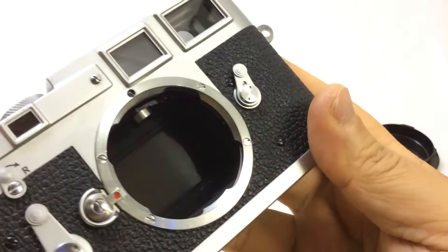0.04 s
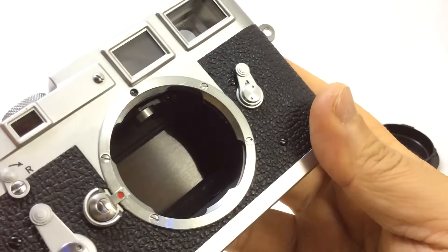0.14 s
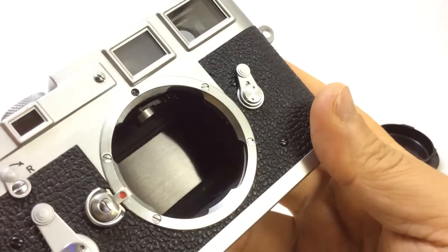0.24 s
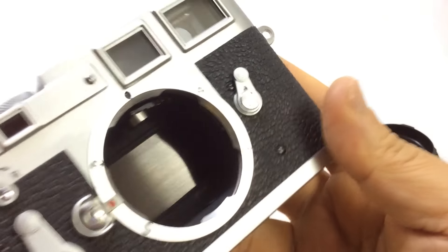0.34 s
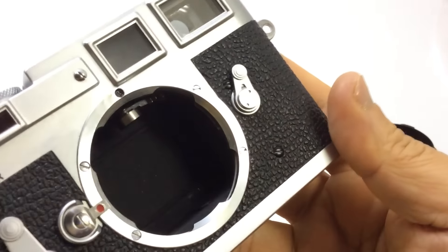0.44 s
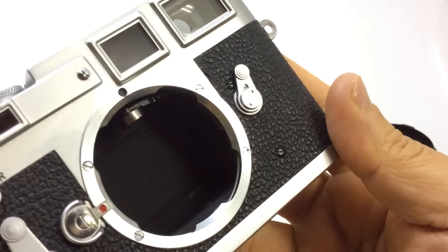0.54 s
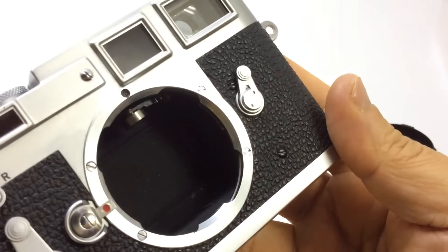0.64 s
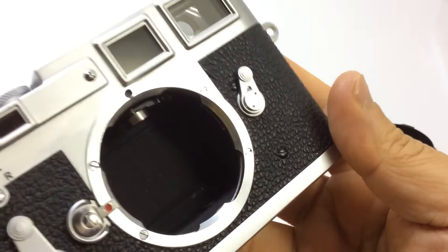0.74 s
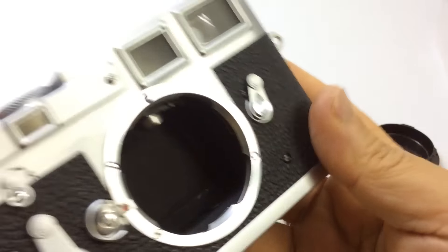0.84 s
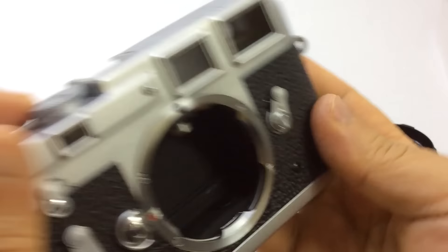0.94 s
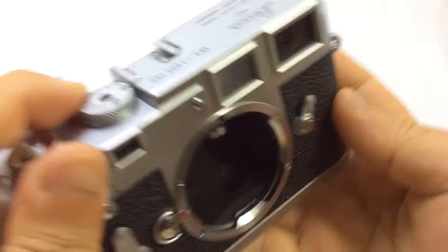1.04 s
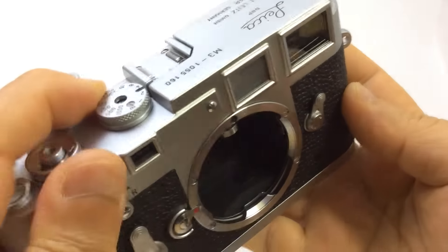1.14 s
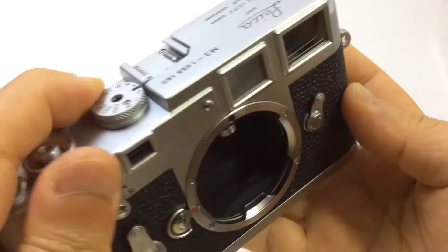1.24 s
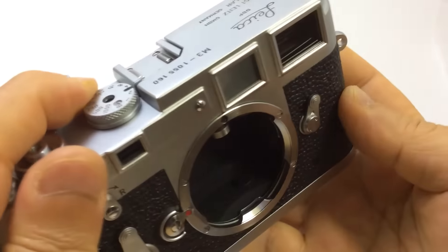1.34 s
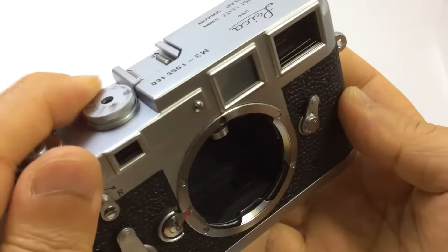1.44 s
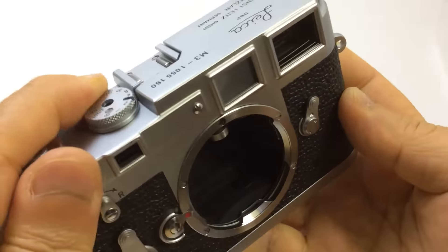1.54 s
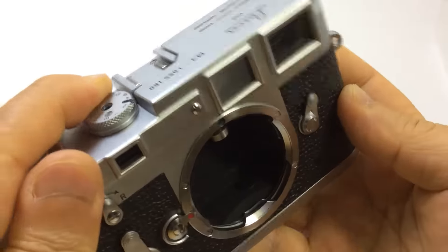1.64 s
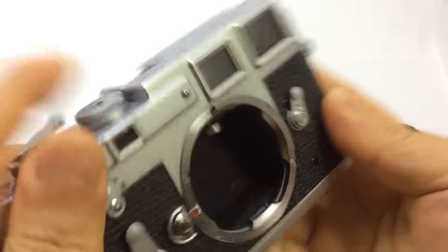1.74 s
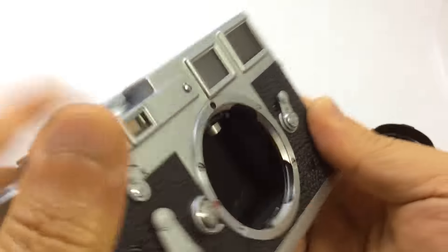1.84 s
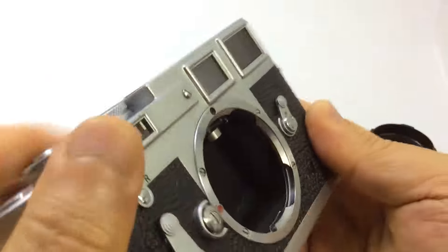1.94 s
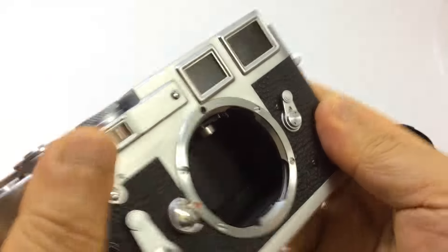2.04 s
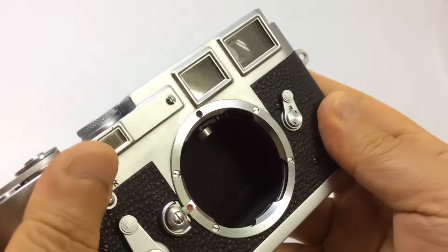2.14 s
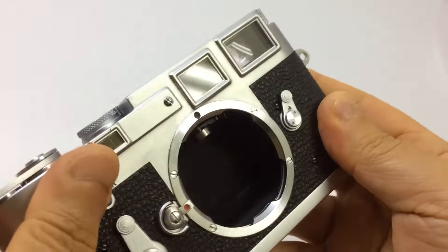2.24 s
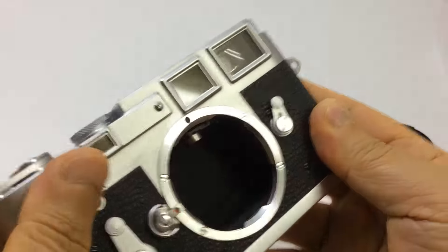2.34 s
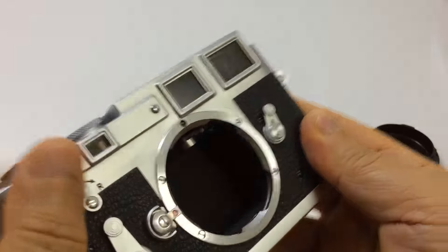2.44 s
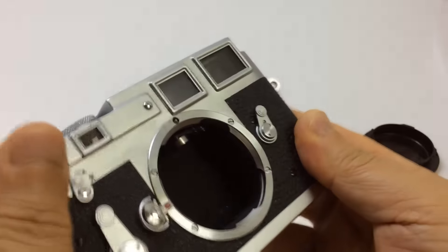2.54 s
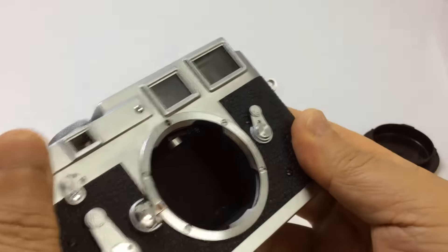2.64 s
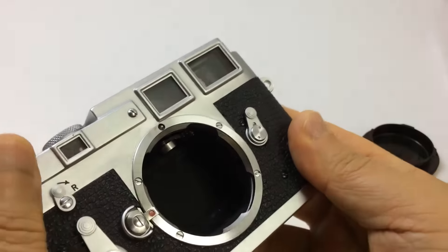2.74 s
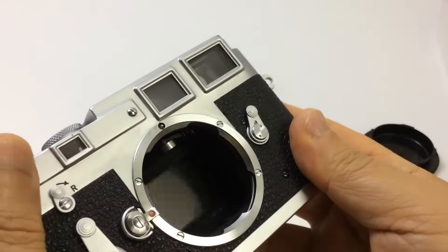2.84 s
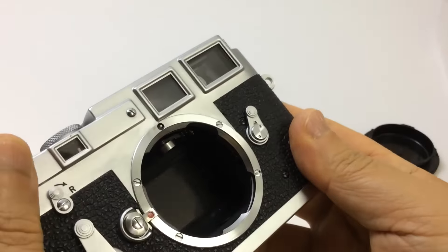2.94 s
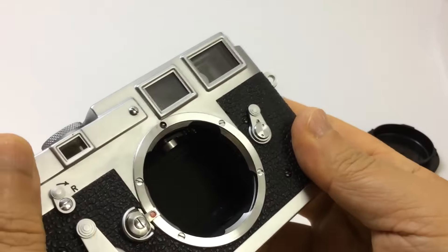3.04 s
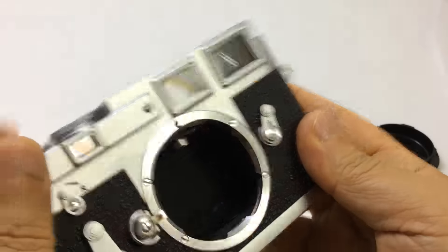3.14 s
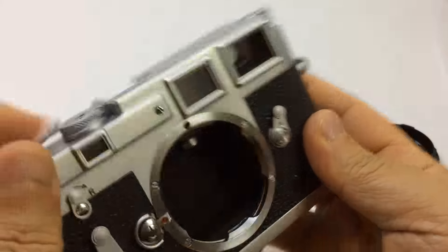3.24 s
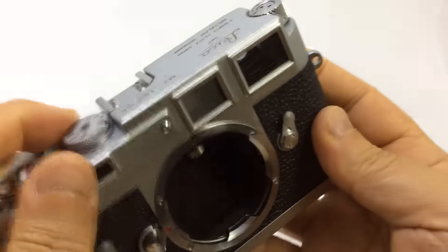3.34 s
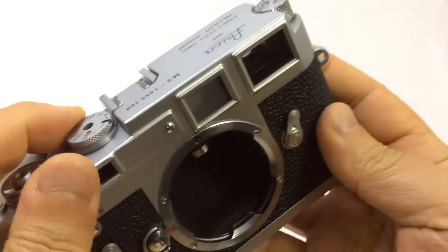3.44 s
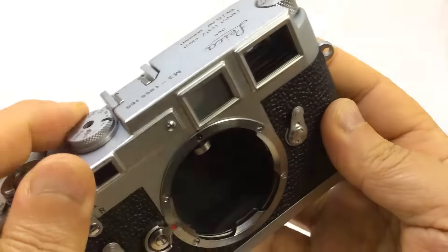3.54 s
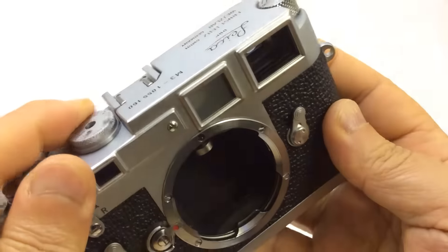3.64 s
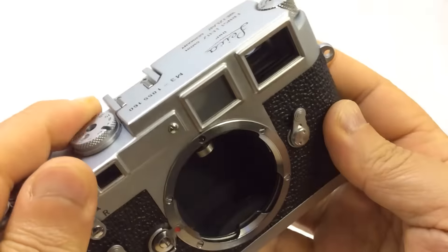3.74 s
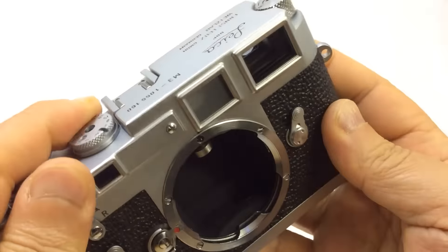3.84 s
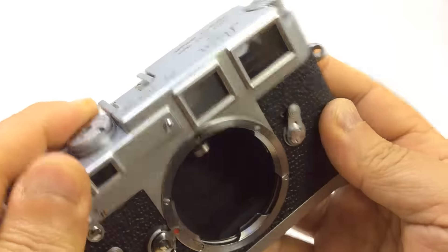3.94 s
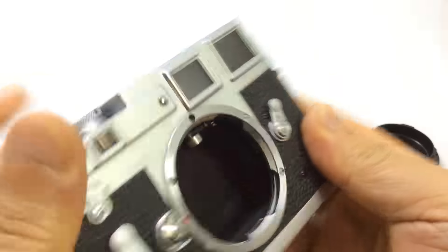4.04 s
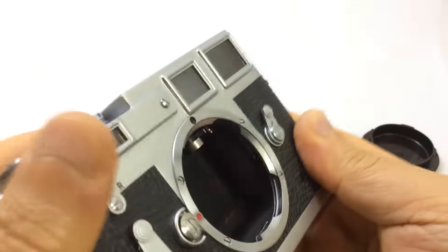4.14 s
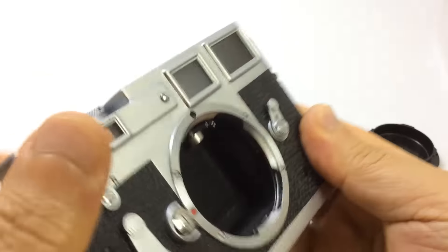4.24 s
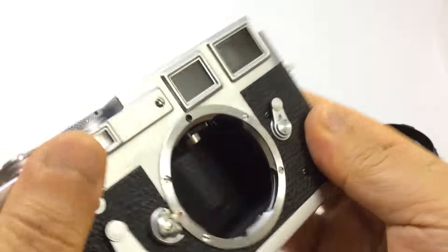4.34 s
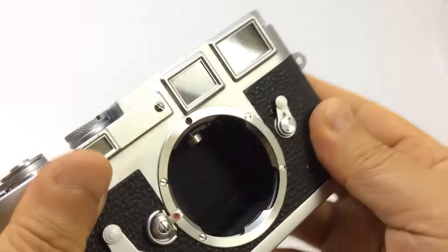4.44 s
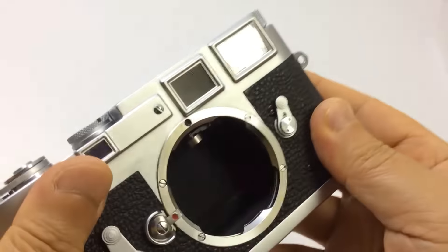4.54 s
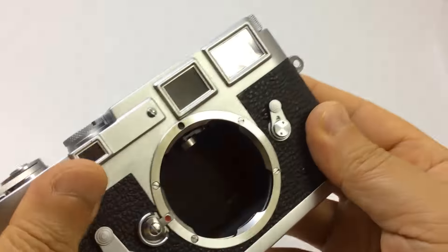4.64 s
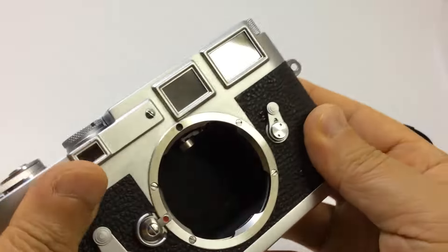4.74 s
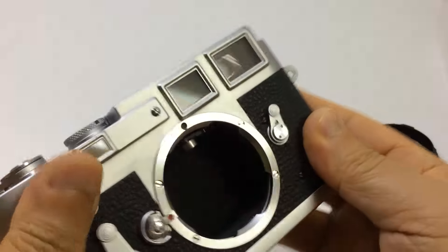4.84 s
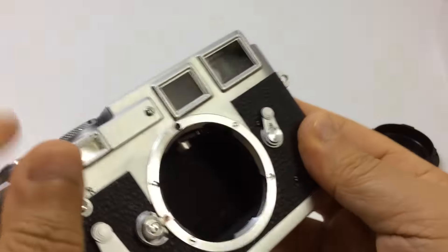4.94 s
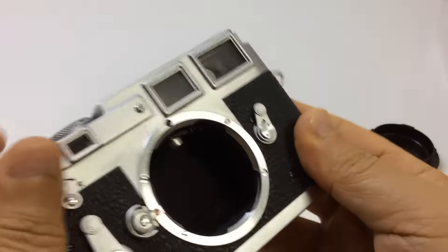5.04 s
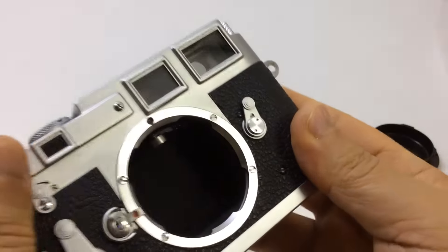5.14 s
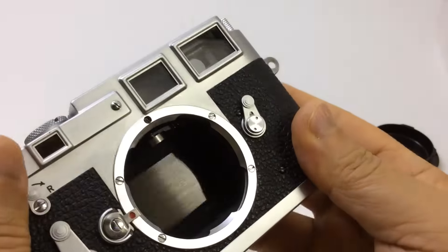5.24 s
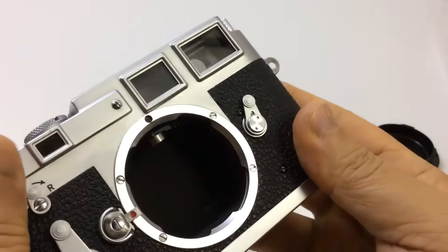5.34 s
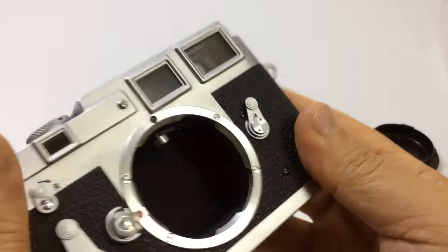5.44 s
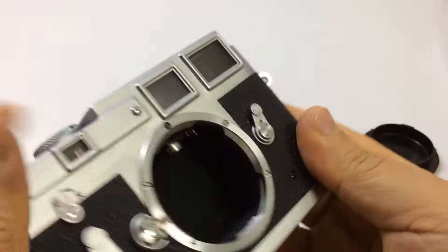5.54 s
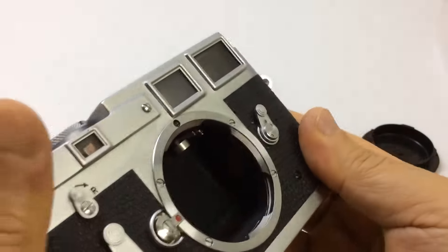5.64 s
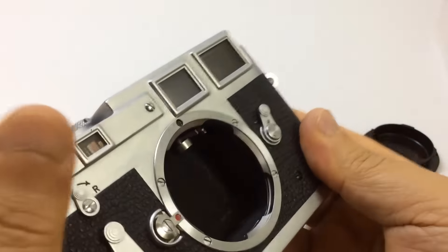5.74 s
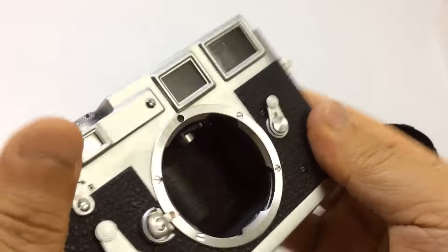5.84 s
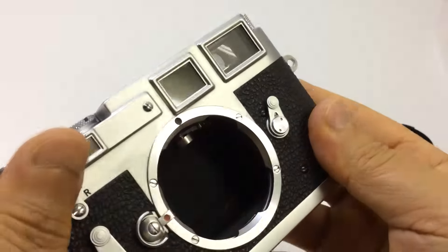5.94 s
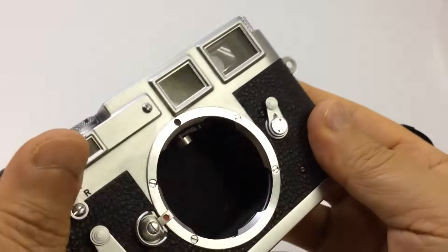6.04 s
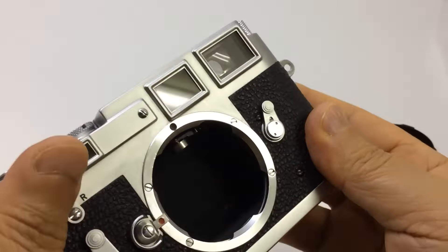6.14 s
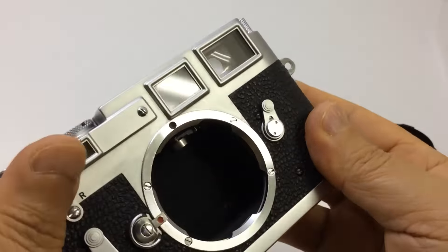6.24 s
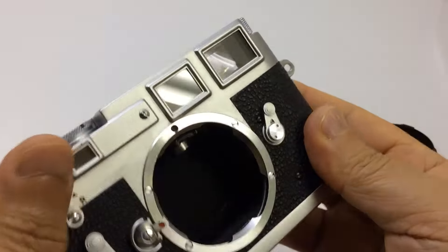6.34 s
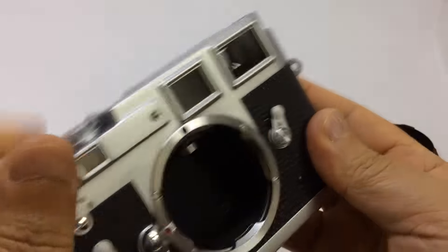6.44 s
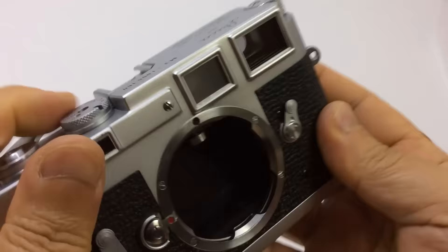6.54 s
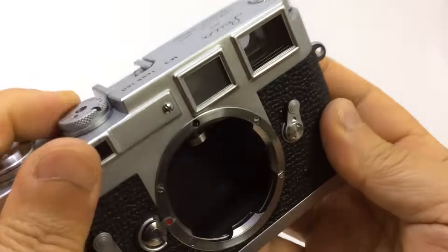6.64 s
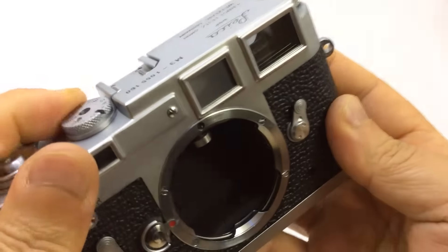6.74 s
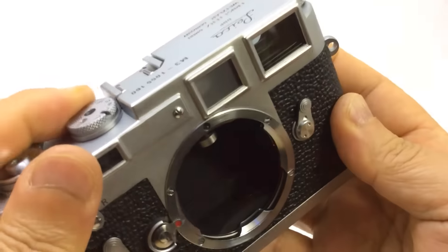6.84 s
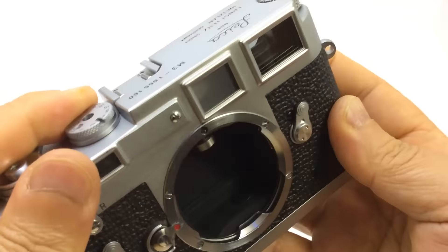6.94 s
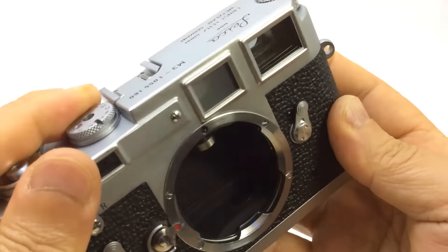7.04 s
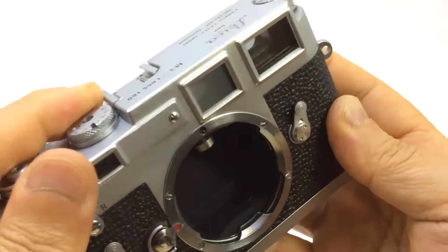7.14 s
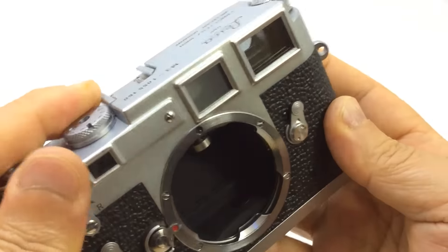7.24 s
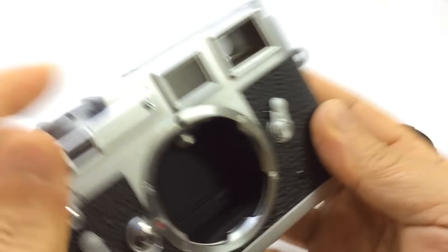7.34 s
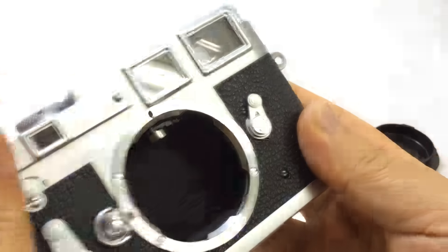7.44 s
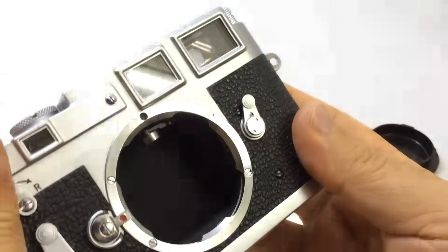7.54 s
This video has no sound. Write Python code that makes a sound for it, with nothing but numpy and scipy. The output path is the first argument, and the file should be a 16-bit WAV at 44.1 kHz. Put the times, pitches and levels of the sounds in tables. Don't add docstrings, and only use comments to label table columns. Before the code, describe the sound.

Close up, a small metal film camera is operated in a quiet workshop with low mains hum, faint hiss and a wavering distant rumble. At 0.15 s the shutter catch lets go with a rattling snap; at 0.44 s the curtains slam with a bright, hard clack. A fine, fast escapement buzz, about ninety ticks a second, runs until 1.1 s. Soft finger touches and faint dial clicks follow at 1.5-1.95 s. From 2.0 s gears knock, a pawl snaps, and the lever hits its stop at 2.3 s, then ratchets back and lands at 2.57 s. The shutter releases at 2.87 s and slams at 3.03 s, with a shorter buzz to 3.4 s. Light clicks, then winding at 4.3-4.7 s and return at 5.0 s. A third firing at 5.3-5.4 s has no buzz; winding at 5.8-6.2 s, return at 6.55 s. Faint handling ends at 7.6 s.

```python
import sys
import numpy as np
from scipy import signal
from scipy.fft import rfft, irfft
from scipy.io import wavfile

SR = 44100
rng = np.random.default_rng(int(sys.argv[2]) if len(sys.argv) > 2 else 0)


def persist_wave(psi):
    counts = np.round(np.clip(psi, -1, 1) * 32767).astype(np.int16)
    wavfile.write(sys.argv[1], SR, np.atleast_2d(counts).T)


def ratio_of_db(decibels):
    return 10 ** (np.asarray(decibels, float) / 20)


N = 334322
TIME = np.arange(N) / SR


def rms_one(x):
    return x / np.sqrt(np.mean(x ** 2) + 1e-20)


def in_time(rows, rest=-120):
    s, *columns = np.transpose(rows)
    return np.array([np.interp(TIME, s, c, rest, rest) for c in columns])


def band(x, low_hz, high_hz, order=2):
    edges_hz = [low_hz, min(high_hz, .45 * SR)]
    return signal.sosfilt(signal.butter(order, edges_hz, "band", fs=SR, output="sos"), x)


def drift(rate_hz):
    r = np.exp(-80 * np.pi * rate_hz / SR)
    slow = signal.lfilter([1], [1, -2 * r, r * r], rng.standard_normal(N // 40 + 2002))[2000:]
    return np.interp(np.arange(N) / 40, np.arange(len(slow)), rms_one(slow))


def ring(force, hz, t60):
    r = ratio_of_db(-60 / (t60 * SR))
    w = 2 * np.pi * hz / SR
    return signal.lfilter([0, np.sin(w)], [1, -2 * r * np.cos(w), r * r], force + 1e-18)


def grit(spread_db):
    size = np.minimum(rng.exponential(1, N), 4)
    return rms_one(rng.standard_normal(N) * ratio_of_db(spread_db * size))


def shaped(points):
    hz = np.fft.rfftfreq(N, 1 / SR) + 1
    table = np.array(points)
    gain = ratio_of_db(np.interp(np.log(hz), np.log(table[:, 0]), table[:, 1]))
    x = irfft(rfft(rng.standard_normal(N)) * gain, N)
    return x / np.std(band(x, 200, 15500))


def contact_rows(rows, low_db, high_db, t60=None):
    rows = np.array(rows)
    has_brightness = rows.shape[1] - (t60 is None) > 2
    bright = rows[:, 2] if has_brightness else 0
    rattle = rows[:, -1] if t60 is None else np.full(len(rows), t60)
    start, middle = rows[:, 0], rows[:, 1]
    return np.transpose([start, middle, middle + low_db - bright, middle + high_db + bright, rattle]).tolist()


# from_hz, to_hz
RATTLE_RANGES = [(2540, 7460), (980, 4350), (6310, 10470)]
LONGEST_RING_S, PAIR_SPLIT_HZ = .042, 50


def struck(contacts, modes, rise_s, spread_db, top_db, knock_db, thud_db):
    t = np.arange(SR // 8) / SR
    shape, knocks = np.zeros((4, N + SR)), np.zeros((4, N))
    for s, *levels_db, t60 in contacts:
        levels_db.append(min(levels_db[:2]))
        burst = (1 - np.exp(-t / rise_s)) * ratio_of_db(-60 * t / t60)
        at = round(s * SR) - 20
        shape[:, at:at + len(t)] += np.outer(ratio_of_db(np.array(levels_db)), burst / burst.max())
        knocks[:, at + 30] = ratio_of_db(np.array(levels_db) + knock_db)
    force = grit(spread_db) * shape[:, :N]
    out = ratio_of_db(top_db) * band(force[2], 12500, 13000)
    out += ratio_of_db(thud_db) * band(knocks[3], 310, 800)
    for row, (low, high) in zip(force, RATTLE_RANGES):
        out += band(row, low, high) * np.sqrt(SR / 2 / (high - low)) * ratio_of_db(-5)
    for hz, level_db, t60 in modes:
        row = 3 if hz < 1000 else 1 if hz < 2400 else 0 if hz < 6500 else 2
        drive = knocks[row] + .5 * force[row]
        held = min(t60, LONGEST_RING_S * (1100 / hz) ** .4)
        split = min(PAIR_SPLIT_HZ, .04 * hz)
        pair = ring(drive, hz - split, held) - ring(drive, hz + split, held)
        out += ratio_of_db(level_db - 28.0) * pair
    return out


# pitch_hz, level_db
HUM = [(120, -60), (240, -76), (360, -79.5)]
# time_s, level_db
DRONE = [(0, -92), (2.4, -86.5), (2.8, -78), (4.3, -74), (4.6, -83), (7.58, -87.5)]
# time_s, level_db
RUMBLE = [(0, -63), (.25, -64.5), (1.06, -55.5), (1.6, -65), (2.03, -60), (2.3, -70), (2.66, -62.5),
          (3.05, -71), (4.43, -67.5), (5.32, -77.5), (6.36, -72), (7.58, -84.5)]
# time_s, level_db
MACHINES = [(0, -70.5), (.69, -68.5), (1.06, -62), (1.6, -65.5), (2.1, -60), (2.66, -65.5), (3.02, -63.5),
            (3.97, -71.5), (4.43, -66.5), (5.32, -77.5), (6.36, -73.5), (7.2, -74), (7.58, -70.5)]
# pitch_hz, level_db per Hz
HISS = [(20, -5), (40, 5), (62, 4.5), (100, 14), (160, 7.5), (250, 7.5), (400, -6.5), (630, -6.5),
        (1300, -17), (2200, -15), (5000, -19), (8500, -17), (11000, -22.5), (15500, -29.5)]
HISS_DB = -72
DRONE_HZ, RUMBLE_HZ = 191, 52.8
STIR_DB, STIR_FOLLOWS, STIR_DB_PER_S = -75.5, 0.55, 1.09


def background():
    rumble_db, murmur_db = in_time(RUMBLE)[0], in_time(MACHINES)[0]
    stir_db = STIR_DB + STIR_FOLLOWS * (murmur_db - murmur_db.mean()) + STIR_DB_PER_S * TIME
    out = ratio_of_db(HISS_DB) * shaped(HISS)
    for hz, level_db in HUM:
        tone = np.sin(2 * np.pi * hz * TIME + rng.uniform(0, 5))
        out += np.sqrt(2) * ratio_of_db(level_db + .3 * drift(2)) * tone
    rumble_turns = np.cumsum(RUMBLE_HZ + 1.5 * drift(2)) / SR
    out += ratio_of_db(rumble_db + 1.5) * (1 + .2 * drift(6)) * np.sin(2 * np.pi * rumble_turns)
    out += ratio_of_db(in_time(DRONE, rest=-94.0)[0]) * rms_one(ring(rng.standard_normal(N), DRONE_HZ, 0.4))
    murmur = np.zeros(N)
    for low in (630, 840, 1110):
        murmur += ratio_of_db(2 * drift(3)) * band(rng.standard_normal(N), low, low * 1.33)
    stir = band(rng.standard_normal(N), 200, 520)
    out += ratio_of_db(murmur_db - 5.5 + 1.5 * drift(2.6)) * rms_one(murmur)
    return out + ratio_of_db(stir_db - 6 + 3.0 * drift(5.0)) * rms_one(stir)


# start_s, level_db, pitch_hz
CURTAIN_SNAPS = [(.1475, -31, 8900), (.149, -23.5, 9400), (.1524, -21.5, 3800), (.1597, -27, 1990),
                 (.1653, -29.5, 3500), (.169, -28.5, 8100), (0.1741, -20, 8180), (0.174, -24.5, 3650),
                 (.1807, -26.5, 8200), (.2915, -46, 1200), (0.4157, -32, 8700), (.4162, -35.5, 3800),
                 (3.0045, -36, 3600), (3.006, -35.5, 8500), (.4393, -12, 10900), (0.439, -18.5, 7650),
                 (0.4406, -14.5, 1680), (.4425, -15, 6250), (.4435, -18, 3680), (.4462, -16, 10700),
                 (2.8674, -34, 8040), (2.869, -21.5, 9300), (2.872, -21, 3880), (2.8793, -26, 10530),
                 (2.8884, -26, 8450), (2.8942, -19.5, 8360), (2.8944, -24.5, 3700), (2.9084, -33, 8200),
                 (3.029, -11, 10510), (3.0314, -16, 9200), (3.0333, -23, 1900), (5.2976, -19.5, 7600),
                 (5.3007, -24.5, 2080), (5.3029, -23, 1690), (5.3087, -23, 7700), (5.3195, -19.5, 7070),
                 (5.3988, -10.5, 10560), (5.3992, -19.5, 4000), (5.399, -17.5, 1900), (5.4051, -23, 8100),
                 (5.4078, -20.5, 10700), (5.4097, -21.5, 9500)]
# start_s, level_db, pitch_hz
LEVER_SNAPS = [(1.513, -58, 3700), (1.5885, -43, 3810), (1.7984, -59, 3500), (1.8302, -55, 3200),
               (1.947, -50, 3500), (2.0336, -34, 3600), (2.0465, -42, 3700), (2.0492, -31.5, 5120),
               (2.0531, -33, 7600), (2.0682, -32, 3160), (2.0727, -41, 3700), (2.1446, -28, 9700),
               (2.144, -33, 5800), (2.2614, -40.5, 2100), (2.2857, -31, 3850), (2.307, -18, 4950),
               (2.315, -35, 3210), (2.5671, -17, 3780), (2.5675, -28.5, 2254), (2.5706, -33.5, 1410),
               (4.315, -29, 5150), (4.3165, -28.5, 5270), (4.321, -33, 8900), (4.3262, -25, 8700),
               (4.3275, -26.5, 3030), (4.3438, -38, 1790), (4.436, -26, 7630), (4.436, -28.5, 5800),
               (4.4363, -32.5, 3280), (4.5549, -46, 9300), (4.5746, -45, 1710), (4.6693, -16.5, 2000),
               (4.6736, -26, 2120), (4.6858, -27, 8930), (4.6856, -25, 1900), (4.6919, -34, 10000),
               (5.0007, -19, 3860), (5.0025, -21, 2674), (5.793, -30, 4950), (5.801, -25, 8670),
               (5.802, -29, 6770), (5.8016, -35, 3300), (5.801, -38, 1880), (5.818, -34, 3060),
               (5.8208, -35, 8100), (5.841, -38, 3000), (5.902, -30, 10400), (5.903, -31.5, 5800),
               (5.9058, -30, 10300), (5.914, -34, 8600), (6.0323, -44.5, 3580), (6.0486, -40.5, 1680),
               (6.1928, -21, 6560), (6.196, -30, 2190), (6.208, -18.5, 5100), (6.2184, -28, 9300),
               (6.5475, -22.5, 3730), (6.5568, -38, 2500), (7.435, -60, 640)]
TOOTH_DB, TOOTH_HZ = -1, 3700
SNAP_RISE_S, SNAP_T60_S, SNAP_CYCLES = .0002, 0.0077, 13


def snaps():
    t, out = np.arange(SR // 10) / SR, np.zeros(N + SR)
    teeth = [(s, db + TOOTH_DB, TOOTH_HZ) for s, db in RATCHET]
    for s, db, hz in CURTAIN_SNAPS + LEVER_SNAPS + teeth:
        shape = (1 - np.exp(-t / SNAP_RISE_S)) * ratio_of_db(-60 * t / (SNAP_T60_S + SNAP_CYCLES / hz))
        out[round(s * SR):][:len(t)] += ratio_of_db(db + 0.5) * shape * np.sin(2 * np.pi * hz * t)
    return out[:N]


# start_s, middle_db, low_db, high_db, rattle_t60_s
CURTAIN_RUN = [(0.1485, -35, -26.5, -28, 0.037), (0.1527, -32, -31, -34, 0.073),
               (0.1737, -26, -31.5, -26, 0.03), (0.2915, -50.5, -42.5, -46.5, 0.039),
               (0.4154, -34.5, -48.5, -34.5, 0.047), (0.4255, -45.5, -52.5, -42, 0.042),
               (2.8685, -25.5, -26.5, -27.5, 0.02), (2.8745, -40, -27, -35.5, 0.035),
               (2.8936, -30.5, -29, -23.5, 0.032), (3.0034, -34, -43.5, -35, 0.038),
               (3.016, -52, -51, -43, 0.026), (5.2977, -25.5, -21, -19, 0.03),
               (5.3065, -50.5, -31.5, -37.5, 0.077), (5.3186, -26.5, -29.5, -22.5, 0.026),
               (5.3747, -39, -38.5, -34, 0.05), (5.5302, -39, -67, -42, 0.059),
               (5.5725, -39, -74, -38.5, 0.034)]
# pitch_hz, level_db, t60_s
RUN_MODES = [(705, -4.5, 0.1), (1025, -16, .08), (2380, -15, 0.09), (2290, -10, .15), (3600, -8.5, .15),
             (5800, -9.5, 0.09), (8200, -15.5, .1)]


def curtains_run():
    return struck(CURTAIN_RUN, RUN_MODES, rise_s=0.00056, spread_db=-1.5,
                  top_db=-10.0, knock_db=19.0, thud_db=-9.0)


# start_s, level_db, t60_s, dull_share_db
SHUDDERS = [(.149, -25.5, 0.15, -9), (.165, -28.5, .06, -8.5), (.44, -36, 0.34, -9.5),
            (2.06, -47.5, .5, -12), (2.146, -45.5, 0.27, -15.5), (2.29, -38, .3, -12),
            (2.309, -39.5, 0.29, -17), (2.567, -44, 0.25, -11), (2.87, -24, 0.13, -12.5),
            (3.005, -37.5, .3, -12), (3.03, -33.5, 0.29, -18), (4.327, -41.5, 0.24, -3.5),
            (4.436, -44.5, .23, -15), (4.668, -23, 0.091, -17), (4.686, -33, 0.24, -16),
            (5.0, -45, .27, -6.5), (5.297, -25, 0.17, -8.5), (5.4, -33, 0.41, -14), (5.803, -40, 0.23, -4),
            (5.903, -40, 0.17, -14), (6.189, -29.5, .1, -20), (6.208, -31.5, 0.21, -9),
            (6.547, -48, 0.27, -6)]
# start_s, length_s, level_db, dull_share_db
RUBS = [(0.171, 0.0084, -34.5, -9.5), (2.892, 0.02, -36.5, -6.5), (.17, 0.33, -47, -15),
        (1.147, 0.049, -81, 22), (1.51, 0.12, -78, 9.5), (1.82, 0.06, -69.5, -2), (1.962, .03, -68, -8),
        (2.048, 0.33, -56.5, -15), (2.457, 0.082, -55, -10), (2.881, .13, -47, -15.5), (3.1, 0.3, -66, -8),
        (3.727, 0.026, -77, 10.5), (4.09, 0.05, -70.5, -16), (4.178, .13, -75.5, 10.5),
        (4.285, 0.28, -59, -6.5), (4.888, 0.098, -55, -12), (5.324, 0.098, -36.5, -11),
        (5.486, 0.1, -46.5, -17.5), (5.699, 0.044, -59.5, -25), (5.929, 0.13, -61.5, -3),
        (6.399, 0.094, -58, -2.5), (7.402, 0.1, -77.5, 14.5)]
RUB_EDGE_S, REST_DB, REST_DULL_DB = 0.0085, -82.5, -86
SHUDDER_RISE_S, STRAIN_S, STRAIN_DB = 0.0019, 0.0036, -16.5
SCRAPE_S, SCRAPE_DB, SCRAPE_DULL_DB = 0.0069, -20, -5


def friction():
    power = ratio_of_db(2 * np.array([[REST_DB], [REST_DULL_DB]])) * np.ones(N)
    for s, db, t60, dull_db in SHUDDERS:
        t = np.maximum(TIME - s, 0)
        shake = (1 - np.exp(-t / SHUDDER_RISE_S)) ** 2 * ratio_of_db(-120 * t / t60)
        strain = ratio_of_db(2 * STRAIN_DB) * np.exp(-2 * np.abs(TIME - s) / STRAIN_S)
        power += np.outer(ratio_of_db([2 * db, 2 * (db + dull_db)]), shake + strain)
    scrapes = [(s - SCRAPE_S, SCRAPE_S, db + SCRAPE_DB, SCRAPE_DULL_DB) for s, db in PAWL + LEVER_HOME]
    for s, length, db, dull_db in RUBS + scrapes:
        outside = np.maximum(np.maximum(s - TIME, TIME - s - length), 0)
        power += np.outer(ratio_of_db([2 * db, 2 * (db + dull_db)]), np.exp(-2 * outside / RUB_EDGE_S))
    return np.sqrt(power)


# pitch_hz, half_width_hz, level_db
SLIDING_COLOUR = [(2580, 140, 7), (3530, 170, 6), (5900, 300, 0), (8300, 400, 3), (9300, 300, 2),
                  (10500, 400, 2)]
# from_s, to_s
THUMB_ON = [
    (1.94, 2.4),
    (2.45, 2.75),
    (4.3, 4.6),
    (4.85, 4.9),
    (5.7, 6.1),
    (6.37, 6.7),
]


def sliding():
    rough = grit(spread_db=2.0) * ratio_of_db(1.2 * drift(60))
    bright = band(rough, 2200, 12000)
    for hz, width_hz, level_db in SLIDING_COLOUR:
        bright = bright + ratio_of_db(level_db) * band(rough, hz - width_hz, hz + width_hz, order=1)
    bright = rms_one(bright)
    thumb = sum((TIME > start) & (TIME < end) for start, end in THUMB_ON)
    damped = 0.43 * band(bright, 2600, 4300, order=1) - 0.34 * band(bright, 4800, 14000, order=1)
    bright = bright + thumb * damped
    dull = rms_one(band(rough, 580, 2400))
    bright_gain, dull_gain = friction()
    return ratio_of_db(-3.5) * bright_gain * bright + ratio_of_db(-8.0) * dull_gain * dull


# start_s, level_db, pitch_hz, t60_s
SPRING = [(2.568, -52, 3780, 0.26), (2.568, -51, 2200, 0.2), (5.002, -56, 2400, .3),
          (6.548, -60, 3780, 0.22), (.446, -45.5, 1660, 0.24), (.446, -46, 3650, .3),
          (3.034, -46, 1660, .25), (5.404, -47, 1700, 0.22), (3.034, -47.5, 3900, 0.27),
          (2.147, -46, 8100, .12), (5.906, -48, 9300, 0.13), (.19, -56.5, 2600, 2.0),
          (0.16, -58, 3520, 1.5), (4.69, -41, 3930, 0.14)]
SPRING_GRIP_S, SPRING_LONGEST_S = .032, .25


def spring():
    out, t = np.zeros(N), np.arange(round(SPRING_LONGEST_S * SR)) / SR
    for s, db, hz, t60 in SPRING:
        song = rms_one(ring(rng.standard_normal(len(t)), hz, SPRING_GRIP_S))
        fade = ratio_of_db(db - 60 * t / t60) * (1 - (t / t[-1]) ** 8)
        out[round(s * SR):][:len(t)] += fade * song
    return out


# start_s, middle_db, low_db, high_db, rattle_t60_s
CURTAIN_SHUT = [
    (0.4376, -26.5, -33.5, -25.5, 0.027),
    (0.4394, -15.5, -17.5, -14, 0.033),
    (3.0271, -16.5, -18, -11.5, 0.033),
    (5.3962, -27, -36.5, -31, .02),
    (5.3984, -14.5, -19.5, -11, 0.026),
]
# pitch_hz, level_db, t60_s
SHUT_MODES = [(420, -31.5, .08), (640, -16, 0.13), (716, -16, .12), (1680, -1.5, 0.57), (1943, -5, 0.16),
              (3400, -13, 0.13), (3920, -8, 0.17), (5570, -8, 0.041), (7540, -11.5, 0.11), (9400, -14, .12),
              (10650, -1.5, 0.059), (11480, -3.5, 0.082)]


def curtains_shut():
    return struck(CURTAIN_SHUT, SHUT_MODES, rise_s=0.0006, spread_db=-1.0, top_db=-15, knock_db=24, thud_db=-4)


# time_s, ticks_per_s, level_db
ESCAPEMENT = [
    [(.4625, 88, -61), (.6, 90, -55), (.85, 91, -55.5), (1.0, 88, -56), (1.118, 88, -58), (1.135, 82, -74)],
    [(3.044, 87, -59), (3.2, 86, -60), (3.33, 80, -58.5), (3.388, 91, -61.5), (3.4, 79, -75)],
]
# pitch_hz, level_db, t60_s
ESCAPEMENT_MODES = [(970, -2, 0.07), (2680, -3.5, 0.066), (3680, -4, .07), (4960, -9, 0.05),
                    (8300, -7, 0.07), (10400, -7, .04), (11100, -8.5, .04), (9700, -6, 0.015)]
TICK_RING_S = .011


def escapement():
    out = np.zeros(N)
    for rows in ESCAPEMENT:
        per_s, level_db = in_time(rows)
        turns = np.cumsum(np.maximum(per_s, 0) * (1 + .006 * drift(25))) / SR
        since = turns % 1 / 86
        swing_db = -1.2 * (-1.) ** np.floor(turns) + 1.5 * drift(40)
        tick = (1 - np.exp(-since / 0.0011)) * ratio_of_db(-60 * since / 0.019)
        out += ratio_of_db(level_db + swing_db + 2.0) * (tick + 0.1)
    force = out * grit(spread_db=0.5)
    rings = np.zeros(N)
    for hz, level_db, t60 in ESCAPEMENT_MODES:
        rings += ratio_of_db(level_db - 24 + 1.5 * drift(12)) * ring(force, hz, min(.3 * t60, TICK_RING_S))
    return rings + band(force, 1800, 13000) + .4 * band(force, 2300, 5000, order=1)


# start_s, length_s, level_db, from_hz, to_hz
STIR_NOTES = [(.57, .08, -74, 298, 260), (0.799, 0.069, -69, 265, 240), (.89, 0.086, -69, 241, 270),
              (.98, 0.073, -72, 250, 280), (1.239, .06, -75, 221, 230), (6.619, 0.085, -74, 320, 280),
              (6.751, 0.093, -77.5, 420, 480), (6.86, 0.097, -72, 401, 230), (6.97, .08, -70, 251, 310),
              (7.071, 0.083, -75, 210, 261), (7.138, .11, -70, 401.5, 280), (7.269, 0.17, -81.5, 469, 660),
              (7.18, .17, -85, 1380, 1400), (6.87, .1, -84, 1300, 1280)]


def stir_tones():
    out, waver = np.zeros(N + SR), 1 + .5 * drift(25)
    for s, length, db, from_hz, to_hz in STIR_NOTES:
        size = round(length * SR)
        turns = np.cumsum(np.linspace(from_hz, to_hz, size)) / SR
        out[round(s * SR):][:size] += ratio_of_db(db + 5.5) * np.hanning(size) * np.sin(2 * np.pi * turns)
    return waver * out[:N]


# start_s, level_db, rattle_t60_s
TOUCHES = [(1.1567, -68.5, 0.29), (1.514, -63.5, 0.15), (1.7986, -68, .06), (3.7288, -60.5, 0.09),
           (4.2189, -62, 0.043), (4.278, -57.5, 0.088), (5.7597, -65, 0.11), (5.9836, -58.5, 0.18),
           (6.955, -72.5, 0.098), (7.3975, -70, 0.08), (7.4234, -73, .079), (7.4376, -65, .17)]
# start_s, level_db, brightness_db
DIAL = [
    (1.5871, -50, -4.5),
    (1.9457, -54, -1),
    (3.2407, -48, 5),
    (3.8963, -52, -3.5),
]
# start_s, level_db, brightness_db, rattle_t60_s
GEARS = [(1.998, -51, 0.5, 0.056), (2.0215, -51.5, -9.5, .045), (2.0329, -46, 9, 0.042),
         (2.0481, -31.5, 2.5, 0.036), (2.0717, -44.5, -5, 0.072), (2.095, -51, -3, .03),
         (2.2015, -51, 0, .03), (2.2429, -52.5, -4, .028), (4.2985, -57, 6, .02), (4.3023, -52, -5, .047),
         (4.3253, -29.5, 5.5, .034), (4.367, -54.5, -12.5, .044), (4.454, -45, 1, .025),
         (4.5039, -50, 1, 0.025), (4.5185, -53.5, -3, .025), (4.5566, -49.5, -3, 0.031),
         (5.728, -52.5, 5.5, 0.13), (5.8005, -35.5, 4.5, 0.034), (5.8194, -38.5, 2, 0.024),
         (5.8415, -46.5, -2, 0.045), (5.8815, -54.5, -12, 0.034), (6.0325, -47.5, 0.5, 0.029)]
# start_s, level_db
PAWL = [
    (2.144, -31),
    (4.4352, -31.5),
    (5.902, -33),
]
# start_s, level_db
BUMPS = [
    (2.2613, -77),
    (4.574, -83),
    (6.0486, -83.5),
]
# start_s, level_db
CATCH = [
    (4.3141, -32.5),
    (5.792, -39),
]
# pitch_hz, level_db, t60_s
WINDING_MODES = [(710, 4, 0.2), (1694, 2, 0.05), (2130, 5.5, 0.033), (3500, 3, 0.6), (3850, 2.5, 0.44),
                 (5640, -9, .15), (8020, 5.5, 0.13), (9030, 2, .07), (10400, -24.5, 0.033)]


def handling_and_winding():
    winding = contact_rows(GEARS, low_db=-2.0, high_db=-4)
    winding += contact_rows(TOUCHES, low_db=4.5, high_db=-3)
    winding += contact_rows(DIAL, low_db=-5.5, high_db=-6, t60=0.023)
    winding += contact_rows(CATCH, low_db=-27, high_db=-60, t60=0.029)
    winding += contact_rows(PAWL, low_db=-21, high_db=5, t60=0.036)
    winding += contact_rows(BUMPS, low_db=32.5, high_db=14.5, t60=.009)
    return struck(winding, WINDING_MODES, rise_s=0.00043, spread_db=-3.0, top_db=-7, knock_db=8.0, thud_db=-2.5)


# start_s, middle_db, low_db, high_db, rattle_t60_s
LEVER_STOP = [
    (2.2848, -30.5, -35, -35, 0.061),
    (2.2897, -28, -49, -22.5, 0.018),
    (2.3066, -18.5, -22.5, -17.5, 0.049),
    (4.6685, -29.5, -25.5, -25, 0.04),
    (4.685, -17.5, -23.5, -17.5, 0.038),
    (6.1897, -35.5, -22, -23, 0.037),
    (6.2075, -16.5, -21, -16.5, 0.034),
]
# pitch_hz, level_db, t60_s
STOP_MODES = [(703, -7.5, 0.11), (1616, -8.5, .1), (1900, -6.5, 0.053), (2146, -5, 0.05),
              (5960, -6.5, 0.013), (3854, -12.5, 0.19), (8330, -23, 0.093), (9040, -18, 0.16),
              (9400, -21, 0.05)]


def lever_stops():
    return struck(LEVER_STOP, STOP_MODES, rise_s=0.00021, spread_db=2.5,
                  top_db=-6.5, knock_db=24.5, thud_db=-9.5)


# start_s, level_db
RATCHET = [(2.4552, -55), (2.4647, -49), (2.4889, -48), (2.4979, -44.5), (2.5235, -48), (2.535, -52),
           (2.5468, -58), (2.5585, -43), (4.8546, -59), (4.8956, -56), (4.9069, -50), (4.9292, -49),
           (4.9379, -45), (4.9629, -46.5), (4.9852, -48), (4.9935, -42), (6.3832, -55.5), (6.3951, -53),
           (6.4111, -53), (6.4284, -47), (6.4392, -46.5), (6.455, -54), (6.472, -46.5), (6.4807, -50),
           (6.4988, -50.5), (6.5324, -49)]
# start_s, level_db
LEVER_HOME = [
    (2.566, -29),
    (5.0005, -27),
    (6.5457, -29.5),
]
# pitch_hz, level_db, t60_s
RETURN_MODES = [(713, -15, 0.083), (1388, -6, 0.17), (2136, -2, 0.04), (2500, -10.5, .1), (4056, -3, 0.015),
                (3730, -3, 0.012), (8930, 4.5, .12)]


def lever_returns():
    back = contact_rows(RATCHET, low_db=-7.5, high_db=-7, t60=0.022)
    back += contact_rows(LEVER_HOME, low_db=-7, high_db=-7.5, t60=0.03)
    return struck(back, RETURN_MODES, rise_s=0.0014, spread_db=-4.5, top_db=-2.0, knock_db=23.5, thud_db=-34)


# pitch_hz, t60_s
ROOM = [(400, 0.26), (1200, 0.28), (3000, 0.29), (7000, 0.24), (12000, 0.088)]
ROOM_DB = -13.5


def workshop(x):
    t, step, out = np.arange(SR // 3) / SR, SR // 5, np.zeros(N + SR)
    noise = rng.standard_normal((N // step + 1, len(t))) * np.minimum(t / 0.00082, 1)
    tails = sum(band(noise, hz / 1.2, hz * 1.6) * ratio_of_db(-60 * t / t60) for hz, t60 in ROOM)
    for at, tail in zip(range(0, N, step), tails):
        echo = signal.fftconvolve(x[at:at + step], tail / np.sqrt(np.sum(tail ** 2)))
        out[at:at + len(echo)] += echo
    return ratio_of_db(ROOM_DB) * out[:N]


def scene():
    camera = snaps() + curtains_run() + sliding() + spring() + curtains_shut() + escapement()
    camera += handling_and_winding() + lever_stops() + lever_returns()
    no_bass = signal.butter(2, 200, "high", fs=SR, output="sos")
    camera = signal.sosfilt(no_bass, camera)
    camera += 0.33 * band(camera, 5300, 6400, order=1)
    camera -= 0.69 * band(camera, 830, 980, order=1)
    return (camera + workshop(camera) + background() + stir_tones())[None]


def band_limit(x):
    return signal.sosfilt(signal.butter(12, 16460, fs=SR, output="sos"), x)


def record(dry):
    edge = signal.cheby2(10, 32, 15600, fs=SR, output="sos")
    rounded = .75 * np.tanh(dry / .75)
    return band_limit(signal.sosfilt(edge, rounded))


dry = scene()
out = record(dry)
persist_wave(out)
```